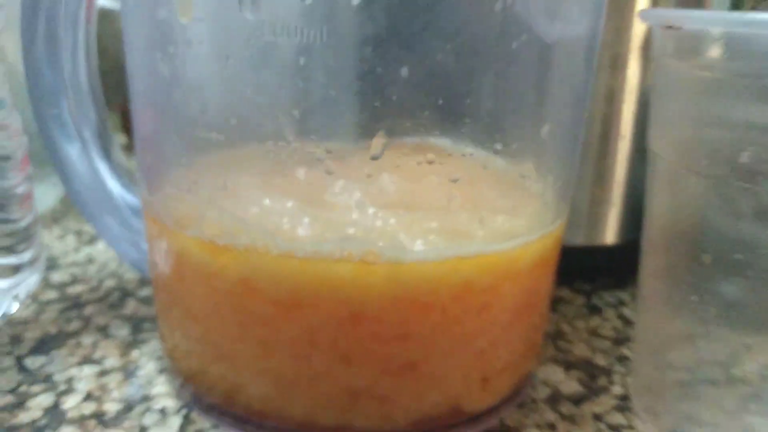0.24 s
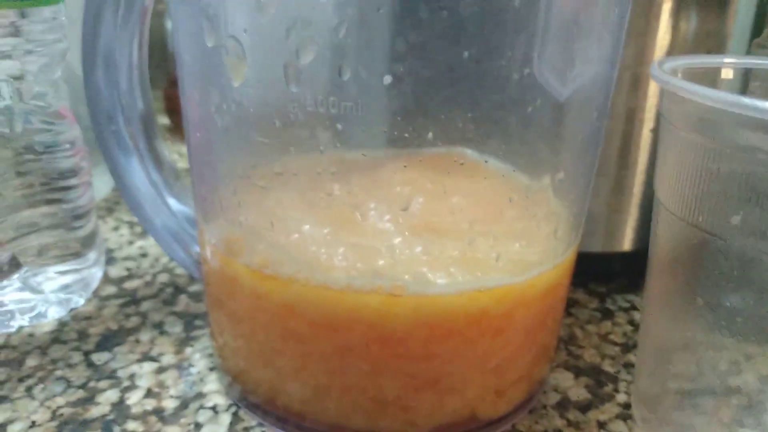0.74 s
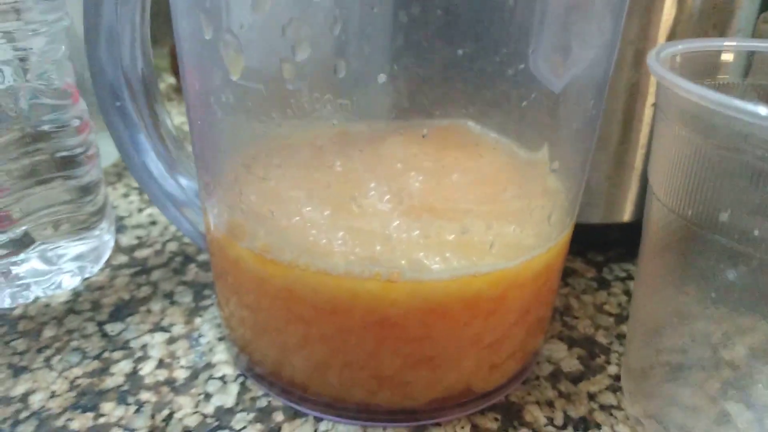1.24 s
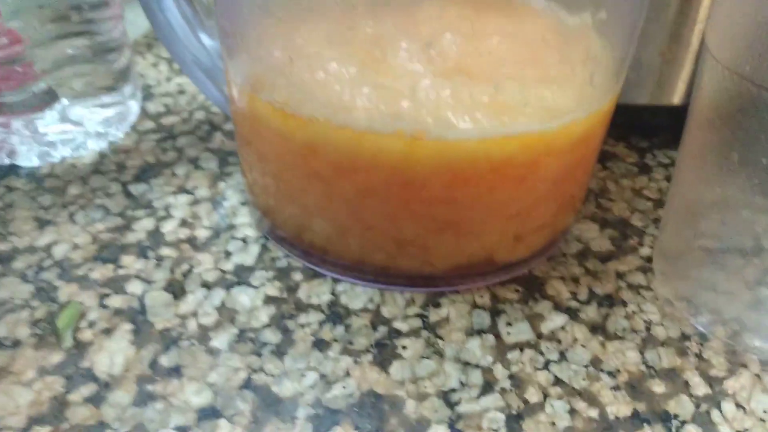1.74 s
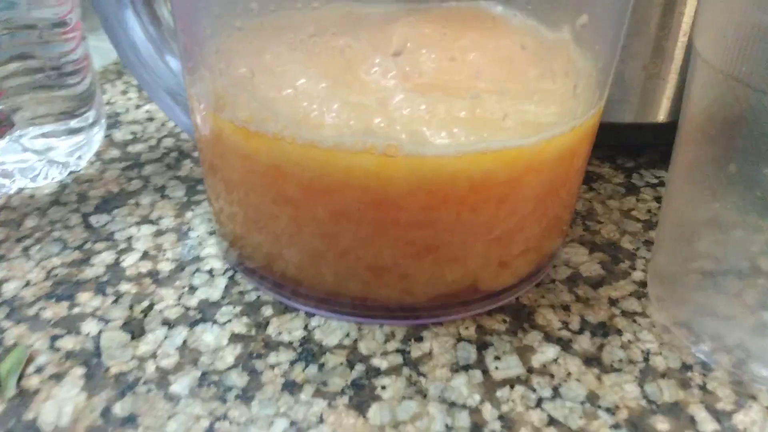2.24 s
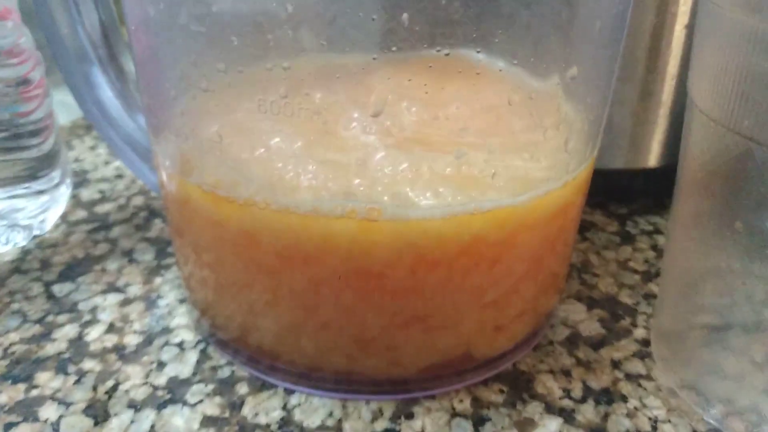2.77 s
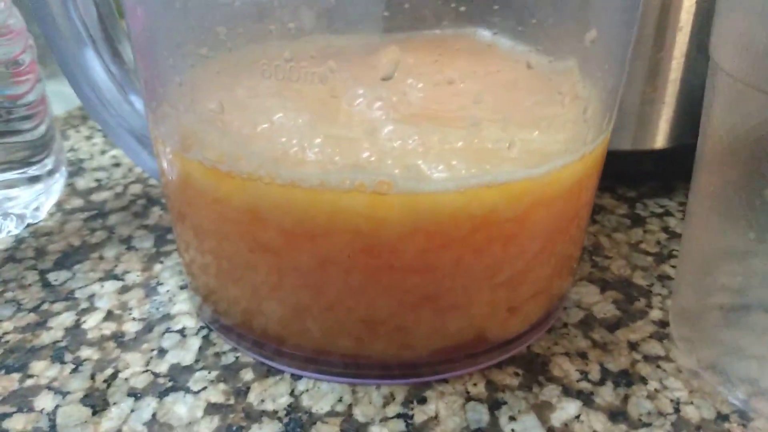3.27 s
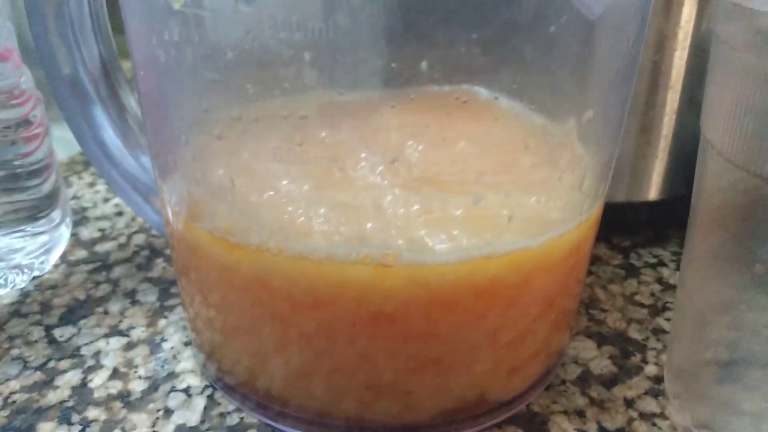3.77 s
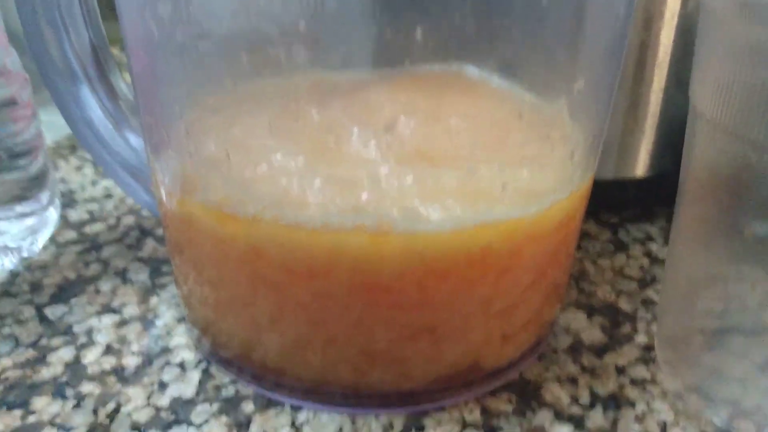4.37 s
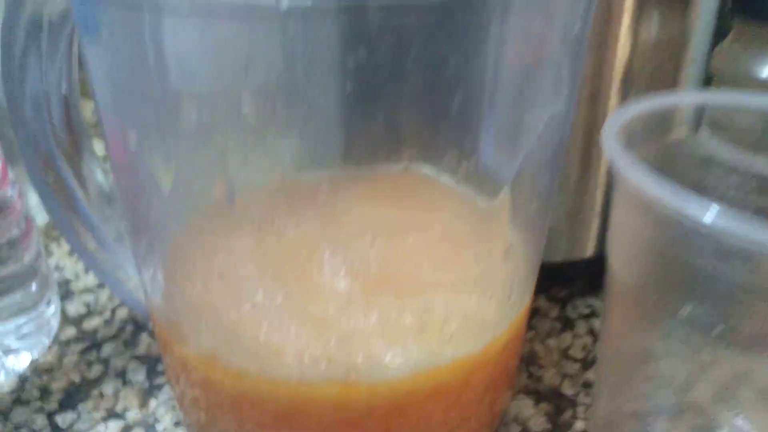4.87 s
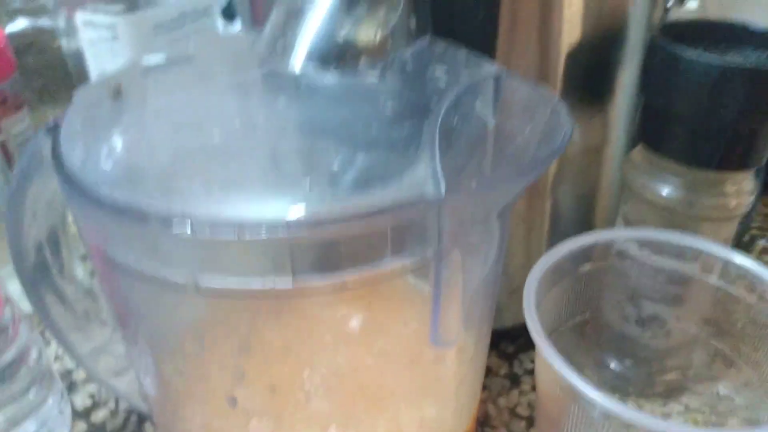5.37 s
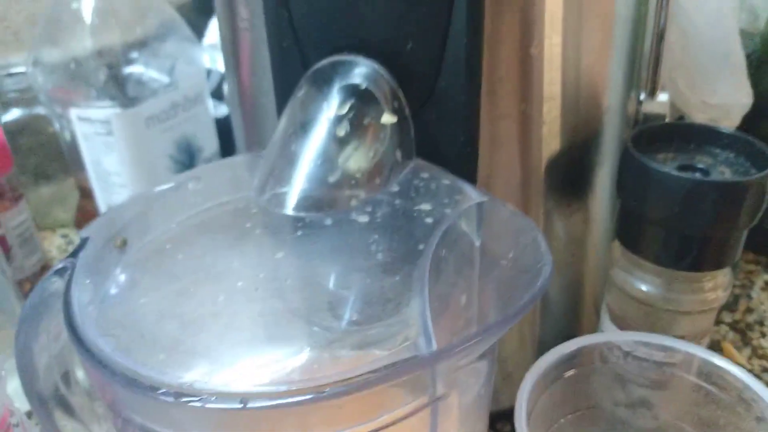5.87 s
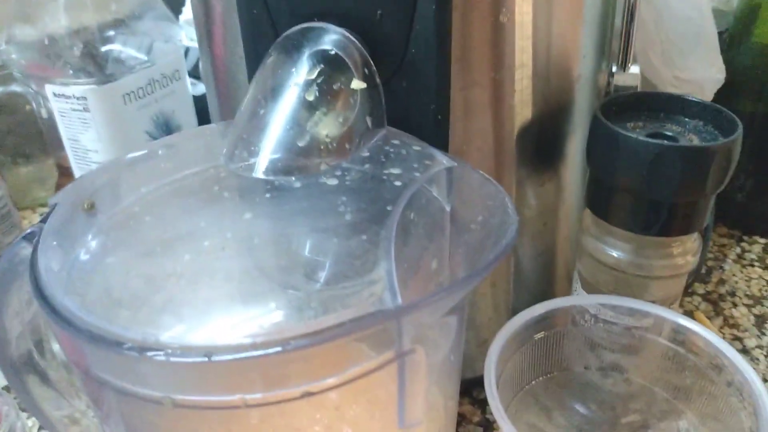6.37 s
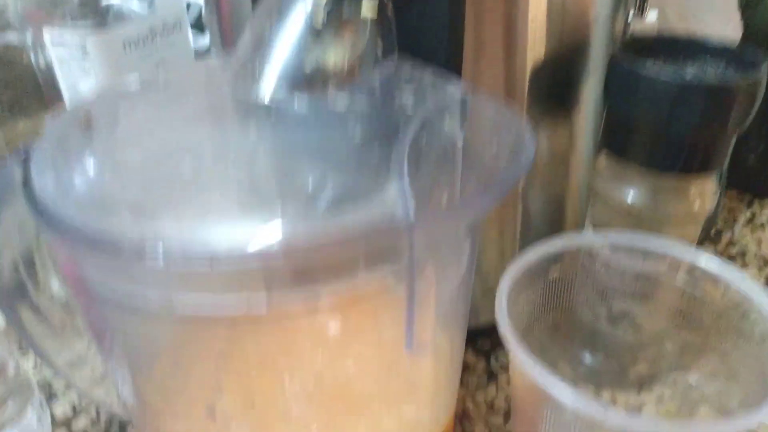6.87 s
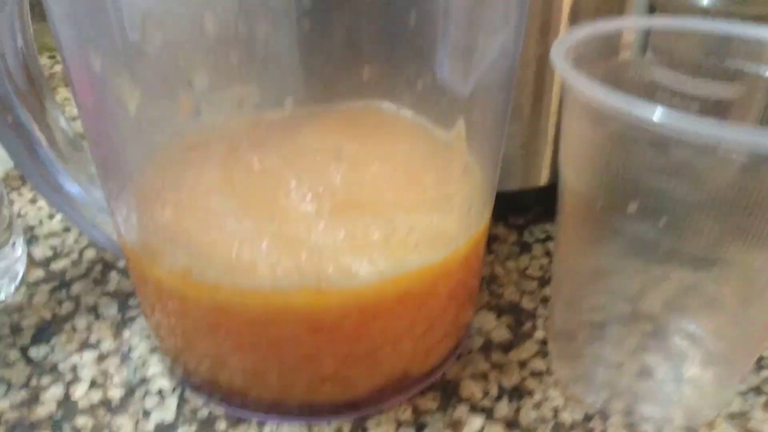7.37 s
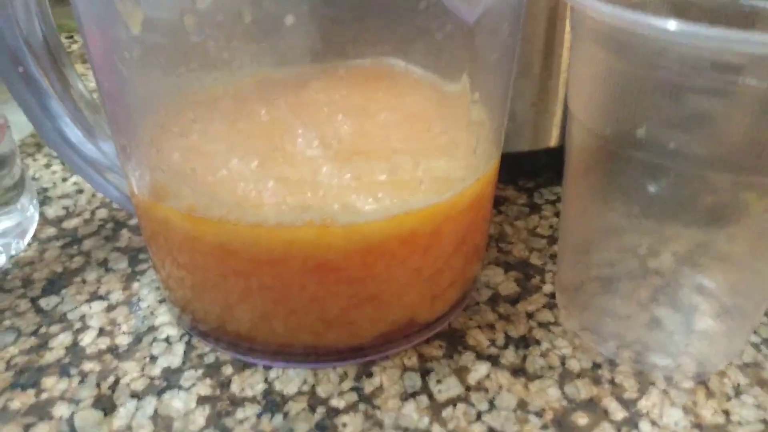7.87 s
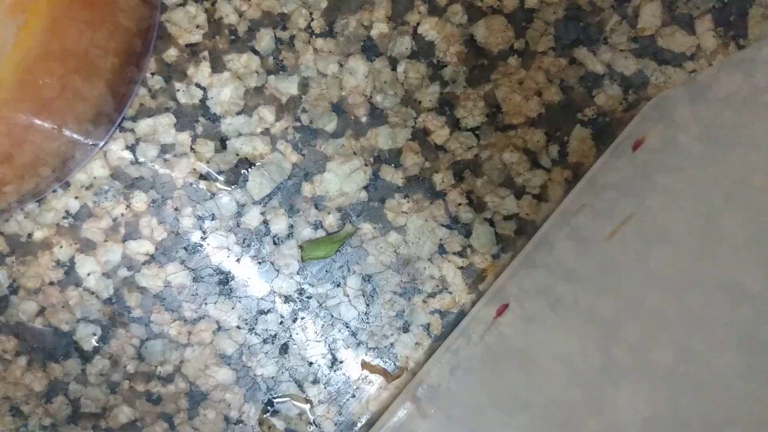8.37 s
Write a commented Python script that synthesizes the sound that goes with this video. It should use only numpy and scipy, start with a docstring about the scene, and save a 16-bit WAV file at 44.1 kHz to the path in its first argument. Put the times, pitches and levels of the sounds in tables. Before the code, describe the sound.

An electric juicer hums and whines under load in a kitchen, swells as the microphone nears its motor, then breaks off into plastic snaps and knocks.

```python
"""An electric juicer runs under load on a stone kitchen counter, heard in two ports of a hand-held microphone.
From the start the motor hums and whines, made from sine tones locked to the shaft and the mains; filtered noise
makes the rush of its housing and the churning pulp. Late on, the microphone rises from the jug to the motor
housing, then sinks again. The sound breaks off; after a faint ring, short noise bursts make plastic snaps,
and clicks set decaying tones ringing for a few knocks, with reflections from the kitchen."""
import sys
import numpy as np
from scipy import signal
from scipy.fft import irfft
from scipy.io import wavfile
from scipy.ndimage import uniform_filter1d

SR = 44100
rng = np.random.default_rng(int(sys.argv[2]) if len(sys.argv) > 2 else 0)


def to_wav(sig):
    """Store sig (one row per channel, or 1-D mono) as 16-bit WAV at the path in sys.argv[1].

    Samples outside -1..1 are clipped; the rate is SR.
    """
    pcm = np.clip(np.atleast_2d(sig), -1, 1) * 32767
    pcm = np.round(pcm).astype(np.int16)
    wavfile.write(sys.argv[1], SR, pcm.T)  # frames by channels


N = 380139
TIME = np.arange(N) / SR

MAINS_HZ, MAINS_START_CYCLES = 60.02, .17
SHAFT_START_TURNS, STOP_S = .05, 8.298
RASP_ABOVE_HZ = 1450
KITCHEN_T60_S = 0.4  # time for the lower echoes to fall by 60 dB
CUTOFF_HZ = 15850
# Churning pulp: left level beside the jug, and its change up at the housing.
CHURN_DB, CHURN_HOUSING_DB = -34.5, -5
# The load eases and builds in a slow cycle, this far either way.
LOAD_CYCLE_S, LOAD_EASES_AT_S, LOAD_SWING_DB = .585, 2.95, 0.5

# Shaft speed. Each row: time in seconds, speed in turns per second.
SHAFT_SPEED = [(0, 185.08), (2, 185.08), (3.5, 185.135), (5, 185.235), (6.2, 185.29), (8.3, 185.31)]
# Microphone place. Each row: time in seconds, place from 0 (beside the jug) to 1 (up at the housing).
MICROPHONE_PLACE = [(0, 0.015), (4.85, 0.017), (5.45, 0.86), (6.9, 1), (7.35, 0.4), (8.3, 0.18)]
# Level changes as the microphone moves. Each row: time in seconds, then changes in dB for the body,
# the whine, the octave of the whine, the upper whine and the treble.
REGISTER_SWELLS = [(0, 3, 5.5, 0.5, 1, -2), (.5, 0.5, 1.5, 0.5, 3, -3.5), (1.3, 0.4, 3, 1, 4, 3),
                   (2.1, 0.5, -1, -1, 4, 2.5), (3.5, 2.5, -0.1, 3, 3, -1.5), (4.75, 1.5, 0, 1.5, 1, 1.5),
                   (5.1, 1.5, 2, 5, -0.5, 4), (5.6, 2, 0.5, 3.1, 3, 2.5), (6.7, 2.1, 0.5, 0.1, 0, 1.5),
                   (7.35, 2, 1.5, 1, -2.5, 4.5), (8.3, 0.7, 1, -3, -8, 0.5)]
# Once-per-turn hum of the unbalanced rotor, before its throb. Each row: time in seconds, left dB, right dB.
ROTOR_HUM = [(0, -51, -70), (2, -46.5, -60), (4.8, -47.5, -62), (5.4, -38.5, -48), (6.2, -37, -39.5),
             (7.1, -38, -42.5), (8.3, -39.5, -50)]
# Mains hum of the stator, the still part of the motor. Each row: multiple of the mains rate, left dB, right dB.
STATOR_HUM = [(1, -78, -83), (2, -64, -71), (3, -54, -62)]
# Motor tones, before swells and trims. Each row: multiple of the shaft rate, multiple of the mains rate added,
# left and right level in dB at the jug, left and right level in dB at the housing.
MOTOR_TONES = [(1, -1, -61, -69, -59, -63), (1, 1, -57, -70, -50, -63), (2, 0, -37, -46, -47, -61),
               (3, 0, -40.5, -70, -38.5, -64), (4, 0, -36.5, -70, -40, -70), (5, -1, -47, -70, -61, -70),
               (5, 0, -47, -70, -57, -70), (6, -1, -45, -66, -46, -70), (6, 0, -45.5, -59, -56, -70),
               (6, 1, -50, -55, -52, -70), (7, 0, -44.5, -70, -53, -70), (9, 0, -59, -54, -49, -50),
               (12, -1, -55, -64, -48, -44), (12, 0, -45, -37, -41, -38), (12, 2, -53, -52, -50, -46),
               (23, 0, -48, -45, -56, -45), (24, -2, -50, -47, -57, -38), (24, -1, -46, -49, -52, -32),
               (24, 1, -52, -50, -54, -44), (24, 2, -54, -49, -55, -46), (26, 0, -55, -49, -67, -52),
               (32, 0, -47, -50, -65, -57), (36, -3, -50, -65, -67, -70), (36, -2, -44, -56, -57, -70),
               (36, -1, -48, -59, -56, -70), (36, 0, -49, -52, -57, -70), (47, 0, -47, -44, -50, -70),
               (48, -3, -47, -44, -49, -70), (48, 1, -48, -52, -54, -70), (49, 0, -45, -47, -56, -70),
               (50, -1, -39.5, -52, -62, -70), (50, 0, -42, -52, -56, -70), (56, 0, -49, -48, -54, -54),
               (60, 0, -49, -65, -47, -60), (61, 0, -45, -59, -50, -70), (63, 0, -50, -45, -51, -70),
               (71, 0, -47, -58, -50, -53), (72, -1, -46, -69, -55, -70), (72, 0, -38.5, -58, -43, -57),
               (72, 1, -43, -68, -47, -53), (72, 2, -48, -70, -51, -61)]
# Octave of the slot tone, 24 per turn, before a trim. It shifts between the ports as the microphone moves
# through its standing waves. Each row: time in seconds, left dB, right dB.
SLOT_OCTAVE_LEVELS = [(0.0, -32.5, -43.5), (1.44, -40, -67), (1.92, -45.3, -62), (2.88, -75, -49),
                      (3.36, -36, -42), (4.64, -68, -42), (4.96, -43, -57), (5.28, -40, -29),
                      (5.76, -66, -33.5), (6.08, -39, -32.5), (7.04, -48, -33), (8.28, -41, -38.5)]
# Upper mains sideband of the slot tone, which makes that tone flutter; it shifts between the ports too.
# Each row: time in seconds, left dB, right dB, before a trim.
SLOT_SIDEBAND_LEVELS = [(0.0, -36, -54), (0.8, -35.5, -29.5), (1.6, -44, -32), (1.76, -46, -44),
                        (3.52, -42.2, -64), (4.8, -37.5, -52.7), (5.12, -44, -34), (5.28, -47.7, -34),
                        (6.4, -35.5, -28.5), (7.2, -43, -30), (7.52, -56, -42.5), (8.28, -52, -31)]
# Commutator whistle, 48 per turn. Each row: time in seconds, level in dB before a trim, left minus right in dB.
WHISTLE_LEVELS = [(0.0, -51, -10), (0.7, -38.5, 9), (1.36, -36.5, 12.0), (1.47, -53, 14), (1.59, -39, -16),
                  (4.43, -42, -46), (4.98, -35, 1), (5.14, -31.5, -11), (5.37, -43.5, 9), (5.99, -53, -5),
                  (6.41, -45.5, 32), (7.03, -43, 21), (7.38, -34.5, 0), (8.28, -40.5, 9)]
# Bands of the rush, before swells and trims. Each row: lower and upper edge in Hz,
# left and right level in dB at the jug, left and right level in dB at the housing.
RUSH_BANDS = [(120, 296, -54.5, -62.0, -49.5, -54.5), (495, 860, -38, -62.5, -44, -63),
              (975, 1410, -36.8, -49, -37.5, -56), (1510, 1740, -41, -41.5, -39.5, -37.5),
              (1770, 2060, -40.0, -41.0, -43.0, -35.5), (2060, 2510, -42, -39.5, -40.5, -34.5),
              (2520, 2780, -55, -50, -48, -47), (3000, 3550, -42.5, -67.0, -42.0, -61.0),
              (3780, 4080, -48.0, -58.5, -47.5, -44.0), (4200, 4810, -42, -41.5, -43.5, -35.5),
              (4850, 5550, -58, -62, -57, -51), (5680, 6070, -48, -46.5, -56.0, -50.5),
              (6250, 6800, -43.0, -48.0, -49.5, -67.5), (6800, 7330, -46.0, -48.5, -51.0, -80),
              (7780, 8600, -45.5, -47.5, -52.5, -72), (8670, 9400, -37.5, -42.0, -46.5, -67.0),
              (9500, 10400, -41.0, -41.5, -50.5, -77.5), (10400, 11000, -46.5, -41.0, -55.0, -56.5),
              (11000, 12300, -40.0, -43.0, -42.0, -55.0), (12300, 13000, -41.0, -44.5, -45.5, -59.5),
              (13050, 13700, -39.5, -53.5, -40.0, -53.0), (13750, 14400, -45.0, -63.5, -44.0, -80),
              (14900, 15750, -48.5, -51.5, -45.0, -80)]
# Shading of the treble at the right port. Each row: time in seconds, change in dB.
RIGHT_TREBLE = [(0, -21), (.25, -4), (.55, -14), (1.45, -24), (1.62, -9), (2.9, 4), (6.3, -1), (6.9, -12),
                (7.4, -5), (8.3, -3)]
# How alike noise is at the two ports. Each row: pitch in Hz, likeness from 0 to 1.
PORT_LIKENESS = [(200, 1), (1000, 0.56), (2200, 0.29), (4500, 0), (9000, 0.05), (15000, 0.1)]
# Bowl resonances. Each row: centre in Hz, width in Hz, gain in dB before evening out.
BOWL_RESONANCES = [(304.7, 34.5, -5), (354.3, 44.3, 6.5), (374, 76.4, -0.5)]
# Marked lulls and surges of the pulp. Each row: middle in seconds, length in seconds, change in dB.
PULP_CHANGES = [(0.697, 0.083, -9), (1.207, 0.31, -4.5), (1.555, 0.084, -17), (2.682, 0.19, 1.5),
                (2.973, 0.23, -6), (5.217, 0.36, 5.5), (5.345, 0.13, -11), (7.178, 0.045, -6),
                (7.85, 0.89, 2)]
# A faint ring. Its single row: start in seconds, pitch in Hz, peak in dB before panning,
# seconds to fall by 60 dB.
FAINT_RING = (8.3415, 588, -55.5, .55)
# Plastic snaps. Each row: start in seconds, burst strength in dB before colouring,
# seconds to fall by 60 dB.
SNAP_BURSTS = [(8.3775, -38, 0.022), (8.388, -48, 0.086), (8.410, -42, 0.023), (8.422, -37, 0.06),
               (8.442, -29, 0.012), (8.4446, -7.5, 0.0078), (8.446, -23.5, 0.053), (8.495, -32, 0.036),
               (8.504, -39, .04)]
# Snap colour. Each row: lower edge in Hz, upper edge in Hz, gain in dB.
SNAP_BANDS = [(250, 580, -1.5), (1800, 5700, -9.5), (4640, 6800, -7), (7740, 13400, -2), (11600, 22000, -7)]
# Knocks on the machine. Each row: time in seconds, click strength in dB, lower and upper edge of the contact in Hz.
KNOCK_CONTACTS = [(8.4443, -36, 200, 4000), (8.4617, -23, 370, 960), (8.4966, -29.5, 905, 1580),
                  (8.499, -33, 440, 650), (8.5078, -41, 300, 1800), (8.597, -47.5, 250, 1100)]
# Ways the machine's body rings. Each row: pitch in Hz, gain in dB, seconds to fall by 60 dB.
BODY_MODES = [(344, -9, .055), (510, -8.5, .065), (628, -7, .045), (700, -6, .012), (820, 1, .021),
              (1120, -8, .03), (1380, -6, .03), (1540, -7, .04)]


def from_db(db):
    """Turn decibels into gain."""
    return np.exp(np.asarray(db) * float(np.log(10) / 20))


def rms_one(x):
    """Scale a sound to unit average power."""
    return x / np.sqrt(np.mean(x ** 2) + 1e-20)


def in_time(rows):
    """Give one curve per column, with straight lines between the rows."""
    seconds, *columns = np.transpose(rows)
    return np.array([np.interp(TIME, seconds, column) for column in columns], np.float32)


def panned(db):
    """Give left and right gains whose mean is one, set apart by this many dB."""
    gains = from_db(np.array([[.5], [-.5]]) * db)
    return gains / gains.mean(0)


def drift(rate):
    """Wander by chance with spread 1; a higher rate in Hz wanders faster."""
    step = 40  # samples that share one value
    r = np.exp(-2 * np.pi * rate * step / SR)
    chance = rng.standard_normal(N // step + 2002)
    slow = signal.lfilter([1], [1, -2 * r, r * r], chance)[2000:]  # skip the filter's start
    return np.repeat(rms_one(slow).astype(np.float32), step)[:N]


def band(x, low_hz, high_hz, order=2):
    """Keep the pitches between two edges."""
    edges = [low_hz, max(high_hz, low_hz + 20)]
    return signal.sosfilt(signal.butter(order, edges, "band", fs=SR, output="sos"), x)


def fade_per_sample(t60):
    """Give the factor per sample that falls 60 dB in t60 seconds."""
    return np.exp(-np.log(1000) / (t60 * SR))


def ring(x, hz, t60):
    """Let a unit click set off a dying sine that starts at height 1."""
    r, w = fade_per_sample(t60), 2 * np.pi * hz / SR
    return signal.lfilter([0, np.sin(w)], [1, -2 * r * np.cos(w), r * r], x + 1e-18)


def click(s):
    """Make a unit click at one moment."""
    return signal.unit_impulse(N, min(round(s * SR), N - 1))


def port_noise(hz):
    """Make white noise at the two ports, as alike as they are at this pitch."""
    points = np.array(PORT_LIKENESS)
    alike = np.clip(np.interp(np.log(hz), np.log(points[:, 0]), points[:, 1]), 0, 1)
    mid, side = rng.standard_normal((2, N))
    return np.sqrt(1 + alike) * mid + np.sqrt(1 - alike) * side * [[1], [-1]]


def reach(hz, port_db, place, swells):
    """Give the gain from machine to ports, from the microphone's place and the swell at this pitch."""
    jug_db, housing_db = np.reshape(np.float32(port_db), (2, 2, 1))
    register = np.searchsorted([2000, 3600, 5500, 7500], hz)  # body, whine, octave, upper whine, treble
    return from_db(jug_db + (housing_db - jug_db) * place + swells[register])


def pulp_load():
    """Give the pulp's load in dB: a slow cycle, with a smooth bump or dip for each surge or lull."""
    load_db = -LOAD_SWING_DB * np.cos(2 * np.pi * (TIME - LOAD_EASES_AT_S) / LOAD_CYCLE_S)
    for middle, length, db in PULP_CHANGES:
        load_db = load_db + db * np.exp(-(2 * (TIME - middle) / length) ** 2)
    return load_db


def hum(shaft, mains, place, throb_db=5.0, stagger_rad=1.0):
    """The rotor turns just faster than the third mains harmonic; it throbs five times a second, most by the jug."""
    stator = sum(from_db([[left], [right]]) * np.cos(round(m) * mains) for m, left, right in STATOR_HUM)
    throb = throb_db * (1 - place) * np.cos(shaft - 3 * mains + stagger_rad * drift(2))
    rotor = from_db(in_time(ROTOR_HUM) + throb) * np.cos(shaft)
    return np.sqrt(2) * (stator + rotor)


def motor_tones(shaft, mains, place, swells, waver_db=2.5, waver_rate=1.45, level_db=-2.5,
                port_rad=1.0, scatter_rad=0.39, slot_db=3.5, load_share=1.0,
                rough_db=2.5, rough_rate=30, whine_db=-2.3):
    """The rotor and its twelve slots sound multiples of the turning rate; mains pulses put sidebands around them."""
    out = np.zeros((2, N), np.float32)
    # Sidebands keep nearly in step with their harmonic; the two ports hear it out of step.
    start_rad = 2 * np.pi * rng.random((73, 1, 1))
    lead = np.float32(start_rad + port_rad * rng.standard_normal((73, 2, 1)))
    for per_turn, per_cycle, *port_db in MOTOR_TONES:
        k, m = round(per_turn), round(per_cycle)
        hz = k * SHAFT_SPEED[0][1] + m * MAINS_HZ
        offset = lead[k] + np.float32(scatter_rad * m * rng.standard_normal((2, 1)))
        gain_db = waver_db * np.clip(hz / 4000, .4, 1) * drift(waver_rate)
        if k == 2:  # this harmonic lies on the bowl's resonance and follows the pulp
            gain_db = gain_db + load_share * pulp_load()
        elif hz < 1500:  # grinding shakes the other low harmonics
            gain_db = gain_db + rough_db * (drift(rough_rate) - .5)
        elif k == 12:  # the slot rate itself drives the housing hardest
            gain_db = gain_db + slot_db
        tone = np.cos(k * shaft + m * mains + offset)
        out += from_db(gain_db) * reach(hz, port_db, place, swells) * tone
    octave = from_db(in_time(SLOT_OCTAVE_LEVELS)) * np.cos(24 * shaft + lead[24])
    sideband = from_db(in_time(SLOT_SIDEBAND_LEVELS)) * np.cos(12 * shaft + mains + lead[12])
    return np.sqrt(2) * (from_db(level_db) * out + from_db(whine_db) * (octave + sideband))


def whistle(shaft, flutter_db=0.5, level_db=-0.3):
    """Forty-eight commutator bars pass under the brushes on each turn and whistle."""
    bars = 48 * shaft + np.array([[0], [1]], np.float32)  # the right port is one radian ahead
    loud_db, pan_db = in_time(WHISTLE_LEVELS)
    gain = from_db(loud_db + level_db + flutter_db * drift(5.7))
    return np.sqrt(2) * panned(pan_db) * gain * np.cos(bars)


def brush_buzz(shaft, order=88, count=8192):
    """The brushes scrape the same worn track on every turn: an even rasp of many shaft harmonics."""
    harmonics = np.exp(2j * np.pi * rng.random((2, order))) * (np.arange(order) > 0)
    track = irfft(harmonics, count, axis=1)
    spot = (shaft / (2 * np.pi) * count).astype(int) % count
    return rms_one(track[:, spot])


def counter_echo(x, place, jug_s=.0016, housing_s=0.0031, sway_s=.00005, echo_db=-11.5):
    """The stone reflects the machine; the lag follows the hand, so fine notches slide through the hiss."""
    sway = sway_s * uniform_filter1d(drift(0.28), size=400)
    lag = jug_s + (housing_s - jug_s) * place + sway
    gain = from_db(echo_db)
    echo = np.array([np.interp(TIME - lag, TIME, port) for port in x])
    return (x + gain * echo) / np.sqrt(1 + gain ** 2)


def rush(shaft, mains, place, swells, mains_db=-0.56, turn_db=-1.0, spark_db=2.5, spark_sharpness=9.5,
         low_buzz=0.21, high_buzz=0.31, flicker_db=1.72, rattle_db=0.3, level_db=-0.76, wander_db=2.0):
    """Air noise and brush rasp pass the housing, pulsing with the mains; the brushes spark once per turn."""
    pulsing = mains_db * np.cos(mains) + rattle_db * drift(31)
    low_pulse = from_db(pulsing + turn_db * np.cos(shaft))
    spark = np.abs(np.cos(shaft / 2)) ** spark_sharpness
    brush_pulse = from_db(pulsing + spark_db * spark)
    buzz, air = brush_buzz(shaft), port_noise(9000)
    roar, hiss = np.zeros((2, 2, N))
    for low_hz, high_hz, *port_db in RUSH_BANDS:
        hz = np.sqrt(low_hz * high_hz)
        if hz < 4000:
            noise, share, pulse = port_noise(hz), low_buzz, low_pulse
        else:
            noise, share, pulse = air, high_buzz, brush_pulse
        share = np.clip(share, 0, 1) * (hz > RASP_ABOVE_HZ)  # share of power given to the rasp
        source = (np.sqrt(1 - share) * noise + np.sqrt(share) * buzz) * pulse
        unrest_db = flicker_db * drift(15.6) + wander_db * (hz > 2500) * drift(0.62)
        gain = from_db(unrest_db) * reach(hz, port_db, place, swells)
        layer = hiss if hz > 2500 else roar
        layer += rms_one(band(source, low_hz, high_hz, order=7)) * gain
    return from_db(level_db) * (roar + counter_echo(hiss, place))


def churn(place, lump_db=3.0, lump_rate=22, right_db=-15.5):
    """Pulp is dragged round in lumps and booms in the bowl."""
    drag = rng.standard_normal(N) * from_db(lump_db * drift(lump_rate))
    boom = 0
    for k, (hz, width, db) in enumerate(BOWL_RESONANCES):
        boom = boom + (-1) ** k * from_db(db) * band(drag, hz - width / 2, hz + width / 2)
    even = boom / np.sqrt(uniform_filter1d(boom ** 2, size=6000) + 1e-12)  # even out slow level changes
    loud_db = CHURN_DB + CHURN_HOUSING_DB * place + pulp_load()
    return even * from_db(loud_db) * from_db([[0], [right_db]])


def low_rumble(level_db=-70.5):
    """Faint low noise rumbles under the running machine."""
    return from_db(level_db) * rms_one(band(port_noise(1000), 17, 130, order=1))


def quiet_room(level_db=-80):
    """Very faint, mostly low noise fills the room throughout."""
    return from_db(level_db) * rms_one(band(port_noise(1000), 60, 1500, order=1))


def faint_ring(pan_db=20.0):
    """Something rings softly in the lull, as one dying sine."""
    s, hz, db, t60 = FAINT_RING
    return panned(pan_db) * from_db(db) * ring(click(s), hz, t60)


def snaps(level_db=-1.5, pan_db=1.0):
    """Stiff plastic lets go in short bright bursts of noise."""
    envelope = 0
    for s, db, t60 in SNAP_BURSTS:
        fade = signal.lfilter([1], [1, -fade_per_sample(t60)], click(s) + 1e-18)
        envelope = envelope + from_db(db) * fade
    bursts = sum(from_db(db) * band(port_noise(low) * envelope, low, high) for low, high, db in SNAP_BANDS)
    return panned(pan_db) * from_db(level_db) * bursts


def knocks(pan_db=8.0):
    """Soft contacts set the machine's body ringing; the rings carry no deep bass."""
    force = sum(from_db(db) * band(click(s) + 1e-18, low, high) for s, db, low, high in KNOCK_CONTACTS)
    body = sum(from_db(db) * ring(force, hz, t60) for hz, db, t60 in BODY_MODES)
    return panned(pan_db) * band(body, 210, 6000)


def kitchen(x, low_db=-14, high_db=-9.0, high_t60=0.2, split_hz=2500):
    """Tiles and counter send back dense reflections; the treble dies first."""
    t = TIME[:SR // 2]
    low, high = rng.standard_normal((2, 2, len(t))) * (t > .003)  # reflections start after 3 ms
    registers = [(low, (120, split_hz), KITCHEN_T60_S, low_db),
                 (high, (split_hz, CUTOFF_HZ), high_t60, high_db)]
    echoes = 0
    for noise, edges, t60, db in registers:
        tail = noise * np.exp(-np.log(1000) * t / t60)
        tail = tail / np.sqrt(np.sum(tail ** 2, axis=1, keepdims=True))
        echoes = echoes + from_db(db) * band(tail, *edges)
    return signal.oaconvolve(x, echoes, axes=1)[:, :N]


def scene(jitter_rad=0.0026, stop_t60=0.022):
    """Join the running machine until its sound breaks off, the handling noises and the quiet room."""
    turns = np.cumsum(in_time(SHAFT_SPEED)[0], dtype=float) / SR + SHAFT_START_TURNS
    shaft = np.float32(2 * np.pi * (turns % 1) + jitter_rad * drift(21))  # angle in radians
    mains = np.float32(2 * np.pi * ((MAINS_HZ * TIME + MAINS_START_CYCLES) % 1))
    place = np.clip(in_time(MICROPHONE_PLACE)[0], 0, 1)
    body_db, whine_db, octave_db, upper_db, treble_db = in_time(REGISTER_SWELLS)
    treble_ports_db = np.array([treble_db, treble_db + in_time(RIGHT_TREBLE)[0]])
    swells = [body_db, whine_db, octave_db, upper_db, treble_ports_db]
    motor = hum(shaft, mains, place) + motor_tones(shaft, mains, place, swells) + whistle(shaft)
    juicer = motor + rush(shaft, mains, place, swells) + churn(place) + low_rumble()
    running = np.exp(-np.log(1000) * np.maximum(TIME - STOP_S, 0) / stop_t60)
    handling = snaps() + knocks()
    return juicer * running + quiet_room() + faint_ring() + handling + kitchen(handling)


def record(dry):
    """Cut the top steeply."""
    return signal.sosfilt(signal.ellip(12, .1, 80, CUTOFF_HZ, fs=SR, output="sos"), dry)


dry = scene()
out = record(dry)
to_wav(out)
```